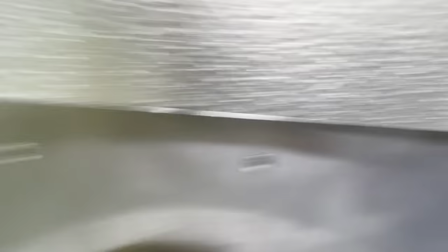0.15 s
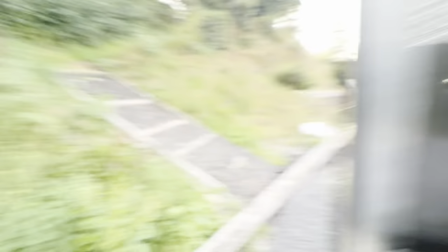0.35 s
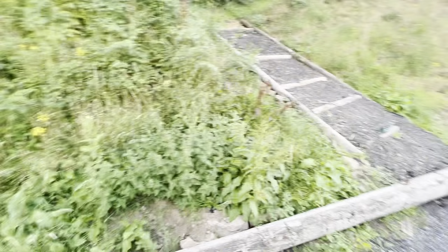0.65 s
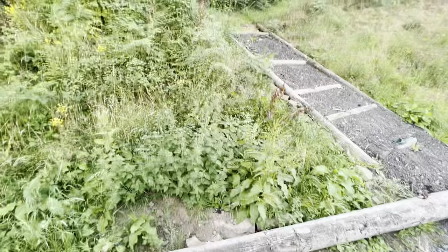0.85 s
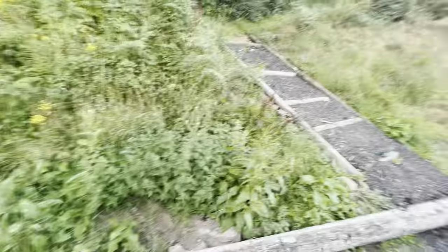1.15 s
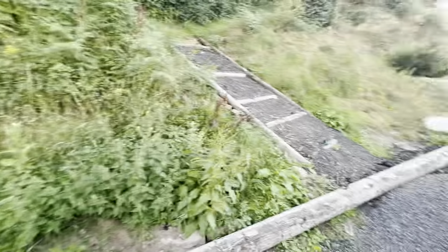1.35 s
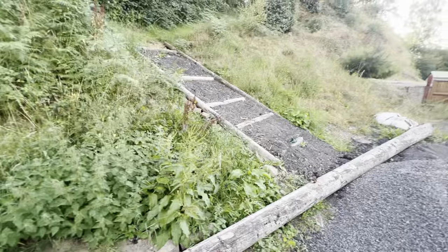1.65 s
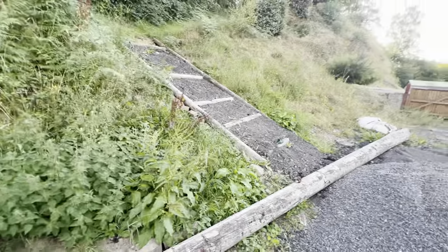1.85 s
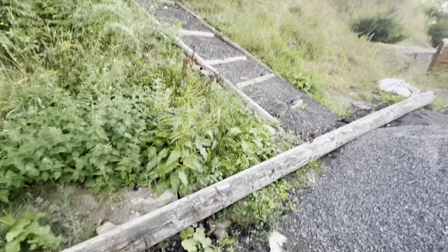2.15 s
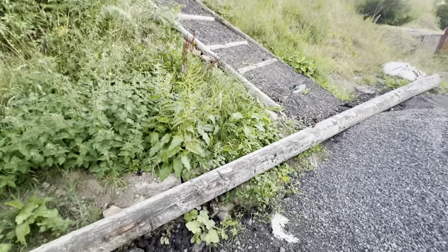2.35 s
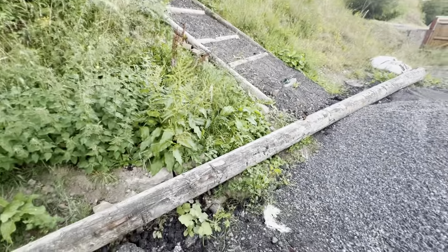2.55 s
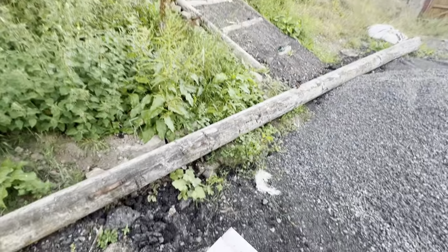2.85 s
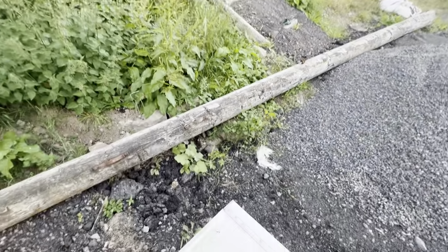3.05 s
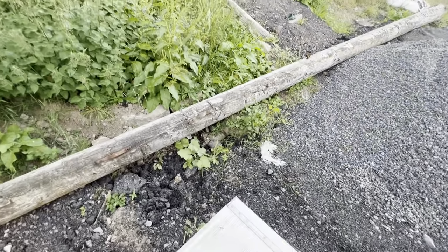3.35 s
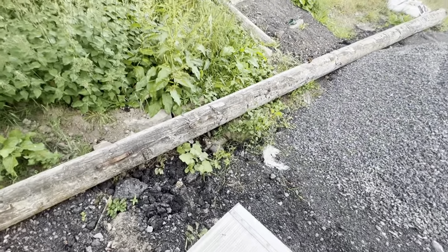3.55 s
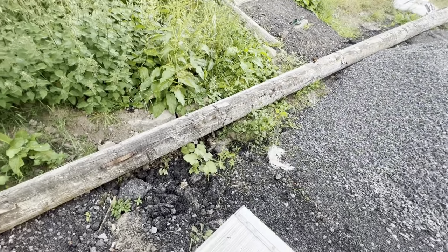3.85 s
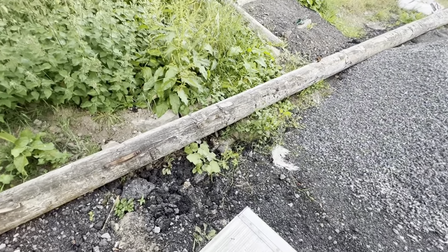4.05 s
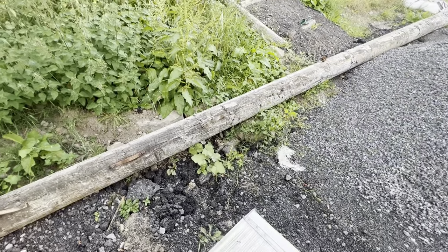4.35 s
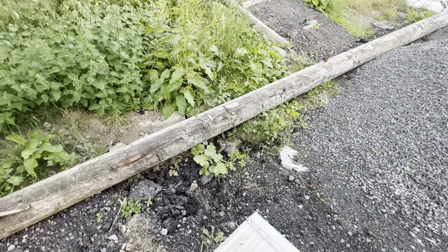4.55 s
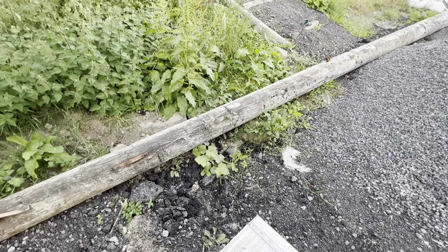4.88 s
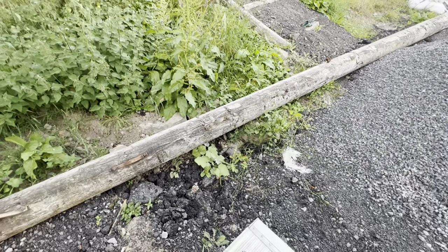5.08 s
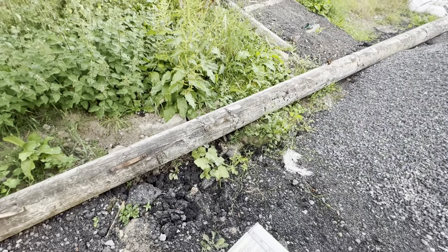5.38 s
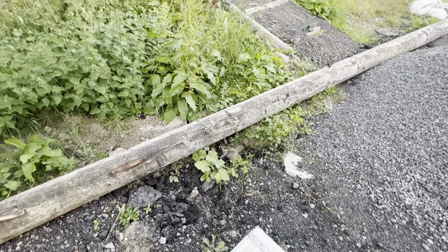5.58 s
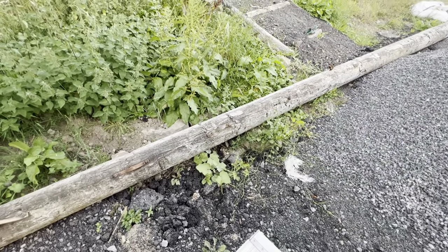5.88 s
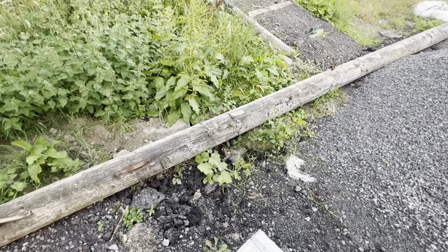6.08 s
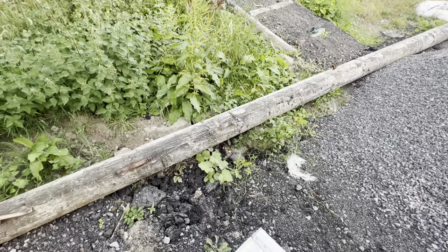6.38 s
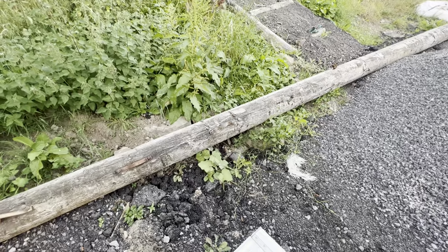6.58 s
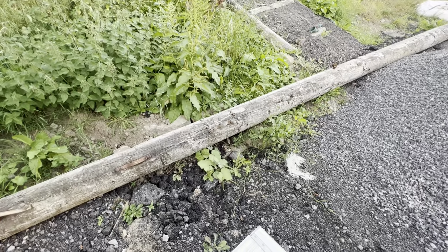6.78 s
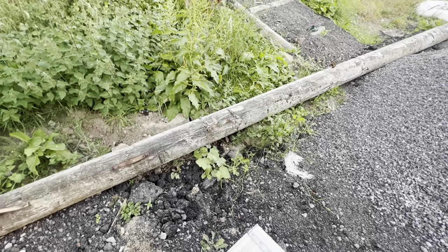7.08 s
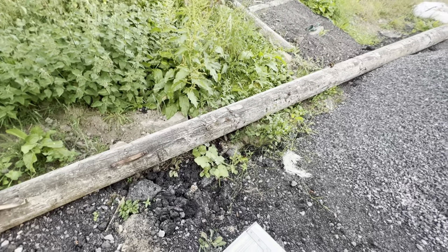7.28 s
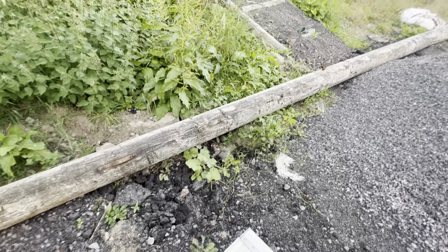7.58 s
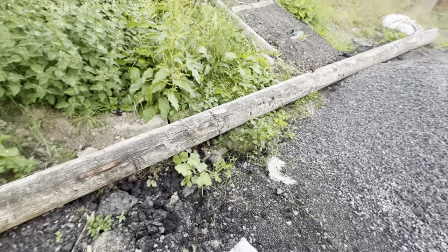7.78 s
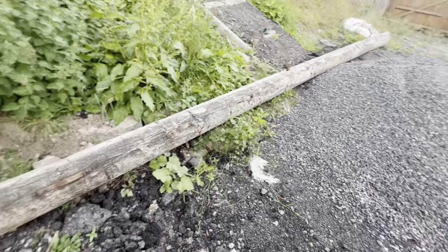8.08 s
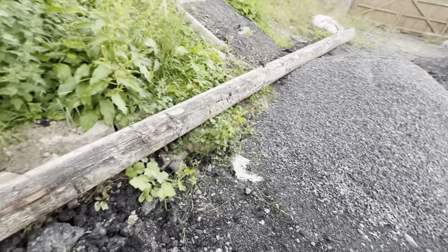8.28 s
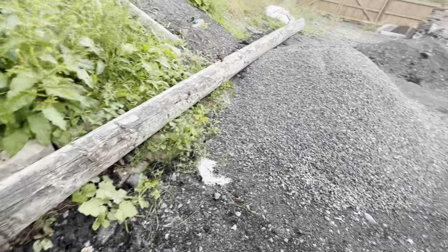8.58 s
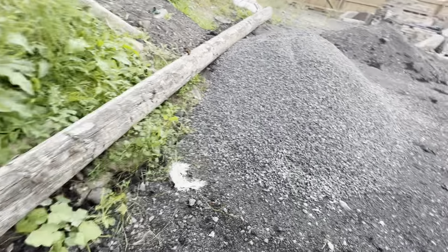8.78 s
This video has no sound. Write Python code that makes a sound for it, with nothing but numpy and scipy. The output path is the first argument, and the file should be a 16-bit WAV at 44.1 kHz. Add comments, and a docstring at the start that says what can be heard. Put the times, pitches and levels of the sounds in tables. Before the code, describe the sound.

A lowering tail lift hisses, judders and clinks before its steel platform thuds down and a flap slams, with boot scuffs on grit.

```python
"""At the back of a truck, a tail lift sinks. Oil throttled by the valve hisses; friction on the runners
makes the platform rumble, judder and squeal; impacts excite the modes of a loose latch and pin.
The carriage meets its end stop and the platform lands with a boom. A boot crushes grit, then a steel
flap slams and rings in its bending modes. Behind it all lie a low boom and a roar: far traffic, plus
the low rumble left after the slam."""
import sys
import numpy as np
from scipy import signal
from scipy.fft import rfft, irfft, next_fast_len
from scipy.io import wavfile
from scipy.ndimage import uniform_filter1d, map_coordinates

SR = 44100
rng = np.random.default_rng(int(sys.argv[2]) if len(sys.argv) > 2 else 0)


def log_audio(samples):
    """Write samples as a 16-bit WAV file to the path given in sys.argv[1]."""
    # one column per channel
    frames = np.atleast_2d(samples).T
    # limit to full scale, then quantise
    limited = np.clip(frames, -1, 1)
    pcm = np.round(limited * 32767).astype(np.int16)
    wavfile.write(sys.argv[1], SR, pcm)


N = 393813

# the sinking lift: t/s, deck rumble/dB, carriage drone/dB, oil flow/dB
DESCENT = [(0, -48.5, -48.5, -52), (.21, -51.5, -54, -61), (.75, -48.5, -56, -58.5),
           (1.0, -51.5, -56.5, -54.5), (1.3, -50, -57, -57), (1.7, -47.5, -58, -60.5),
           (2.14, -47.5, -56, -55.5), (2.58, -51.5, -58, -58.5), (2.95, -48.5, -54, -52.5),
           (3.4, -52.5, -56.5, -55.5), (4.1, -46, -59, -54.5), (4.65, -47, -55, -55),
           (4.93, -44.5, -56, -53.5), (5.4, -48.5, -59.5, -57), (5.62, -53.5, -61.5, -58.5),
           (5.93, -64, -69.5, -72.5), (6.3, -63, -88, -76)]
# noise spectra of the deck, the carriage and the oil's two bands: f/Hz, level/dB
RUMBLE_SPECTRUM = [(15, -54), (30, -7), (75, -1.5), (129, -1.5), (162, 0), (216, -9.5), (314, -13.5),
                   (384, -16), (500, -24.5), (650, -56.5), (1100, -120)]
DRONE_SPECTRUM = [(180, -17.5), (300, -3), (393, 0.5), (555, -6.5), (618, 1), (1090, -0.5), (1530, 0.5),
                  (2190, -9.5), (2600, -26.5), (3380, -44), (5720, -120)]
HISS_SPECTRUM = [(1180, -41.5), (2000, -5), (3020, 0.5), (4020, -5.5), (4970, -1), (5720, -2.5), (6430, -3),
                 (7600, -18.5), (9880, -48), (16700, -120)]
FIZZ_SPECTRUM = [(4470, -39), (7600, -14), (7940, 0), (8990, 2.5), (10300, -10.5), (10800, -27.5),
                 (11600, -25.5), (14300, -13), (16000, -32)]
# the platform judders on its runners: t/s, level/dB
JUDDERS = [(0.14, -46), (0.658, -43.5), (1.283, -50.5), (3.862, -47), (3.981, -46), (4.038, -47),
           (4.092, -45.5), (4.152, -43.5), (4.24, -41.5), (4.307, -44), (4.369, -44), (4.601, -50),
           (4.726, -45), (4.779, -48), (4.835, -43), (5.145, -47.5)]
# the runners squeal: start/s, end/s, start f/Hz, end f/Hz, bandwidth/Hz, level/dB
SQUEAL_BANDS = [(-.2, .24, 3020, 2980, 92, -54.5), (.17, .42, 2950, 2800, 110, -60.5),
                (-.1, 0.64, 1400, 1800, 88, -61.5), (.36, 0.74, 2880, 3170, 140, -58.5),
                (.66, 1.3, 3150, 3300, 120, -61), (1, 2.2, 3130, 3250, 140, -64),
                (1.4, 2.4, 1822, 1750, 52, -66), (1.6, 2.28, 4800, 4900, 110, -66.5),
                (2.25, 2.85, 4330, 4480, 120, -67), (1.5, 2.85, 6150, 6080, 120, -68),
                (3, 4.6, 1700, 1700, 210, -64), (3.88, 4.42, 2310, 2300, 26, -60),
                (4.4, 5.55, 2730, 2850, 100, -59), (4.8, 5.4, 2950, 3130, 170, -54.5),
                (4.4, 5.45, 5540, 5540, 50, -60), (3.25, 4.4, 4950, 4850, 100, -67.5),
                (4.4, 5.35, 5050, 5150, 59, -64), (5.6, 6.22, 3330, 3500, 290, -69.5)]
# loose steel parts knock: t/s, latch level/dB, frame level/dB, jangle T60/s, left minus right/dB
LATCH_KNOCKS = [(0.892, -19, -37, 0.041, 7.5), (0.9053, -16.5, -35, 0.046, -4),
                (0.9255, -8, -22.5, 0.045, 1.2), (0.941, -20, -37.5, 0.076, -12),
                (0.962, -2, -23, 0.057, -5.5), (0.9714, -20, -38.5, 0.14, -3),
                (1.473, -36.5, -43.5, 0.085, -1), (1.963, -49, -43.5, 0.099, -3),
                (2.101, -36.5, -47.5, 0.28, 5.5), (3.7648, -20, -40.5, 0.073, 0),
                (3.823, -39.5, -61, .065, 5), (5.009, -37, -48, .065, -2), (5.145, -45, -47, 0.053, -5),
                (7.5722, -45, -42.5, .1, -3), (7.652, -23.5, -38, 0.042, -1.2),
                (7.745, -19.5, -44, .035, 1.5), (7.989, -49, -36, 0.13, 2), (8.04, -37, -19, 0.13, -1),
                (8.825, -43, -49, 0.081, 4), (8.87, -32, -45.5, 0.099, 0.5)]
# resonances of the latch and the frame: f/Hz, bandwidth/Hz, level/dB
LATCH_MODES = [(2820, 170, 2), (4930, 780, -1), (5240, 160, 0), (5770, 89, 3.5), (6200, 140, -17),
               (7300, 500, -2.5), (8510, 430, 1), (8260, 200, -6.5), (9750, 490, -6)]
FRAME_MODES = [(851, 24, 3.5), (1130, 40, -6.5), (1340, 90, 0), (1510, 60, 0), (1930, 90, -7.5),
               (2480, 150, -7), (2825, 90, -6.5)]
# the frame's dull clonk and the pin's bright clack: f/Hz, level/dB
CLONK_SPECTRUM = [(180, -29.5), (300, -9), (494, -15), (1130, 0.5), (1230, -15), (1320, 0.5), (2800, -14),
                  (4000, -20.5), (5200, -48), (8800, -120)]
CLACK_SPECTRUM = [(590, -25), (1000, -5), (2250, -4), (3380, 2.5), (5310, -9), (5830, 0), (7620, -14),
                  (9170, -8), (10900, -28.5), (16000, -35)]
# a loose pin chatters in its hole: t/s, level/dB
PIN_BOUNCES = [(2.848, -39), (2.8584, -30.5), (2.9138, -29.5), (2.9757, -30.5), (3.032, -30.5),
               (3.083, -34.5), (3.132, -31.5), (3.1818, -32), (3.225, -40), (3.258, -43), (4.7638, -35.5),
               (4.8313, -41), (5.3194, -27), (5.389, -32.5), (5.451, -35), (5.5213, -31), (5.577, -31),
               (5.6277, -33), (5.675, -39.5), (5.7322, -43.5), (8.282, -40.5), (8.368, -45), (8.54, -48)]
# its free vibrations: f/Hz, level/dB, T60/s
PIN_MODES = [(1480, 2, 0.16), (1763, -0.5, 0.16), (3050, 4.5, 0.19), (3320, 4, 0.13), (3450, 0, 0.12),
             (3960, 2, 0.15), (4790, -0.5, 0.14), (5730, 2, 0.16), (6360, -1, 0.17), (6560, -1, 0.15),
             (6700, -3, 0.11), (9300, -15, .06)]
# weight lands on the platform: t/s, level/dB, contact time/s
DECK_BLOWS = [(1.187, -42.5, 0.002), (5.334, -22.5, .004), (5.356, -23, 0.003), (5.377, -24, 0.0049),
              (5.404, -23.5, 0.0055), (5.462, -29, 0.0055), (7.589, -29, 0.005), (7.601, -35, 0.006),
              (7.662, -38, 0.0058), (7.725, -30.5, 0.0052), (8.041, -8, 0.0035), (8.056, -5.5, 0.00342),
              (8.066, -6.5, 0.003), (8.077, -10, 0.0027), (8.109, -18, 0.0032), (8.133, -10, 0.00425),
              (8.148, -15.5, 0.0033), (8.198, -25.5, 0.0025), (8.24, -23, 0.0033), (8.269, -24.5, 0.0028),
              (8.3, -27, 0.0031), (8.34, -32, 0.0038), (8.537, -31.5, 0.0039), (8.704, -30.5, 0.0036),
              (8.74, -35.5, 0.0041), (8.8, -43, 0.0046)]
# resonances of the deck, the end stop and the flap's panel: f/Hz, bandwidth/Hz, level/dB
DECK_MODES = [(84, 12.4, -6), (118, 20, -12), (143.4, 12.7, -4.5), (165.3, 9, 1), (182.8, 14.2, -1.5),
              (255.7, 17, -8), (298, 16.6, -6), (342.7, 12, -2.5), (449, 42, 0), (670, 143, -3)]
STOP_MODES = [(2840, 180, -2.5), (3050, 56, -2), (4600, 140, -5), (5360, 160, -0.5), (5940, 270, -8)]
PANEL_MODES = [(450, 26, 1), (563, 53, -5), (672, 60, -3), (875, 92, -4), (1012, 66, 0), (1113, 34, 1.5),
               (1188, 43, 1.5), (1440, 100, -4.5), (2030, 210, -16.5)]
# the flap hits and rebounds: start/s, attack/s, level/dB, hold/s, sag/(dB/s), release/(dB/s)
BODY_SWELLS = [(8.037, 0.0043, -25, 0.016, 98, 450), (8.048, 0.0084, -12.5, 0.0053, 300, 600),
               (8.074, 0.0033, -24, 0.0067, 200, 500), (8.09, 0.019, -32, 0.058, 7, 189)]
CLATTER_SWELLS = [(8.081, 0.0083, -23.5, 0.066, 30, 800), (8.159, 0.0074, -39.5, 0.071, 101, 300)]
RING_SWELLS = [(8.082, 0.0043, -18.5, 0.034, 150, 500), (8.095, 0.026, -19.5, 0.038, 150, 900),
               (8.172, 0.011, -35, 0.051, 200, 700)]
# the flap's broad clatter and its thin, high modes: f/Hz, level/dB
SHEET_SPECTRUM = [(1180, -16), (2000, -11.5), (3040, -7.5), (5300, -12.5), (5730, -7), (6090, -13.5),
                  (6820, -13), (7640, -17.5), (8630, -14), (10500, -23.5), (10900, -61), (12000, -26),
                  (16000, -48)]
FLAP_MODES = [(5568, -1.5), (6794, -12), (6600, -18), (6340, -21), (3080, -17), (3388, -17), (4905, -18),
              (5040, -19), (4656, -21), (8340, -22)]
# a boot scuffs: start/s, attack/s, level/dB, hold/s, sag/(dB/s), release/(dB/s)
SCUFF_SWELLS = [(.1, 0.072, -53.5, .005, 11.5, 600), (2.1, 0.091, -60, .01, 10, 400),
                (7.195, 0.11, -61, .25, 24.5, 31), (7.535, .03, -64, 0.061, 10, 300),
                (7.637, 0.014, -50.5, 0.099, -30, 300), (7.739, 0.039, -41, 0.04, 32, 899),
                (7.846, .02, -68, 0.2, 6, 50), (8.196, 0.091, -57, 0.33, 6, 46),
                (8.676, 0.076, -57, .04, 22, 202), (8.814, .015, -56.5, 0.097, 10, 100)]
# spectra of crushed grit and of dry clicks: f/Hz, level/dB
GRIT_SPECTRUM = [(350, -39), (600, -11.5), (717, -20), (944, -1.5), (1550, -7), (4160, -8.5), (4780, -6),
                 (7410, -15.5), (8620, -3.5), (11700, -22), (14500, -28), (16000, -39)]
CRACK_SPECTRUM = [(700, -30), (1400, 3), (3000, -1), (6800, -1), (9000, -0.5), (12000, -27)]
# dry clicks, ticks of a tiny part and pings of a small plate: t/s, level/dB
CRACK_HITS = [(.398, -34), (7.299, -56), (7.3205, -40.5), (7.3806, -43), (7.386, -40.5), (7.457, -47),
              (7.548, -49), (7.685, -45), (7.7725, -43), (7.783, -41), (7.795, -34), (7.808, -32),
              (7.826, -39)]
TICK_HITS = [(0.9864, -37.5), (0.995, -34.5), (1.0044, -38), (1.0296, -40), (1.049, -35.5), (1.063, -43),
             (1.0804, -47), (1.121, -42.5), (1.153, -46), (1.1837, -48), (1.6844, -50.5), (1.714, -52),
             (4.9761, -48.5)]
PING_HITS = [(.398, -44), (1.474, -41), (1.963, -47)]
# resonances of the tiny part: f/Hz, bandwidth/Hz, level/dB
TICK_MODES = [(6900, 500, -9), (8280, 500, 0), (9640, 700, -5)]
# background: far traffic, plus the low rumble left after the slam: t/s, boom/dB, roar/dB
BACKGROUND_LEVELS = [(.25, -46.5, -62.5), (.9, -58, -63), (5.8, -60, -63.5), (6.8, -56.5, -64.5),
                     (7.45, -53.5, -61), (7.75, -55, -58.5), (8, -50, -60.5), (8.3, -39.5, -59.5),
                     (8.55, -53, -60), (8.93, -45.5, -57)]
# spectra of the boom and the roar: f/Hz, level/dB
BOOM_SPECTRUM = [(13, -44.5), (25, -20), (33, -7), (70, -6), (82, -1.5), (92, -16), (129, -11.5),
                 (150, -14.5), (450, -30.5), (580, -73), (990, -120)]
ROAR_SPECTRUM = [(260, -49), (450, -11), (580, -11), (664, -10), (818, -3), (950, 2), (1420, -4), (1680, 0),
                 (2620, -27.5), (5380, -28.5), (6930, -21), (10200, -30), (12600, -28.5), (16000, -39.5)]
# likeness of the left and right channels: f/Hz, correlation/1
COHERENCE = [(60, 0.94), (200, 0.89), (450, 0.07), (1200, 0.067), (1800, 0.048), (4000, 0.048),
             (9500, 0.12), (10500, 0.87), (12500, 0.67)]
# balance of sound from the lift's side and from the road's: f/Hz, left minus right/dB
LIFT_BALANCE = [(60, 2), (200, .5), (700, -2.5), (1290, 4.5), (2380, 4), (4400, 11), (8120, 12),
                (10000, -6), (15000, 2)]
ROAD_BALANCE = [(60, 2.5), (240, -0.5), (950, 2.5), (3770, 21.5), (10000, 1.5)]
# the left microphone hears later: f/Hz, left phase lead/cycles
PHASE_LEAD = [(0, 0), (260, -.015), (600, -.28), (10500, -4.5), (11300, -4.5), (12300, -5), (22050, -5)]
# a dip in the microphones' response: f/Hz, gain/dB
MIC_DIP = [(7000, 0.5), (7450, -2), (7650, -15.5), (7850, -0.5), (8200, 0)]


def lift():
    """Turbulence in the valve makes the oil hiss; sliding friction shakes the deck and the carriage."""
    rumble_db, drone_db, flow_db = curves(DESCENT, outside=-120)
    shake = wobble(14)
    jolts = blows([(s - .004, db) for s, db in JUDDERS], t60=.11, rise=.0061)
    rumble = amp(rumble_db + 1.9 * shake + 1.4 * wobble(2.6)) * noise(spectrum(RUMBLE_SPECTRUM))
    drone = (amp(drone_db + .66 * shake) + jolts) * noise(spectrum(DRONE_SPECTRUM), streak_db=4)
    hiss_gain = amp(flow_db - 2.5 + .85 * wobble(6.1)) + amp(-9.5) * jolts
    hiss = hiss_gain * noise(spectrum(HISS_SPECTRUM), streak_db=3.6, streak_frames=15)
    fizz_db = -67.5 + 1.8 * (flow_db + 54.5) + .8 * wobble(15)  # swings wider than the flow
    sizzle = swell(start=1.35, attack=0, db=-95, hold=0, sag=0, release=60)
    fizz = (amp(fizz_db) + sizzle) * noise(spectrum(FIZZ_SPECTRUM), streak_db=3)
    return rumble + drone + hiss + fizz


def runner_squeals():
    """Friction excites narrow bands: low-passed noise modulates a gliding, wavering carrier."""
    out = np.zeros((2, N))
    for start, end, start_hz, end_hz, width_hz, db in SQUEAL_BANDS:
        n, first = round((end - start) * SR), round(start * SR)
        pole = np.exp(-np.pi * width_hz / SR)
        slow = signal.lfilter([1], [1, -pole], rng.standard_normal((3, 2, n)))
        drift = slow[0] + 1.2 * slow[1:]  # a shared part plus one for each channel
        hz = np.linspace(start_hz, end_hz, n) * (1 + .009 * wobble(14, n))
        phase = 2 * np.pi * np.cumsum(hz) / SR
        band = unit_rms(drift[:, 0] * np.cos(phase) + drift[:, 1] * np.sin(phase))
        squeal = band * signal.windows.tukey(n, .35) * amp(db + 1.1 * wobble(12, n))
        out[:, max(first, 0):first + n] += squeal[:, max(-first, 0):]
    return from_lift(out)


def latch_knocks():
    """Impact excitation: each contact rings the latch and the frame, then dies away as a jangle."""
    def steel(hz):
        contact = 1 / (1 + 1j * hz / 9000 - (hz / 10000) ** 2) ** 3  # finite contact cuts the top treble
        return contact * (modes(LATCH_MODES)(hz) + modes([(4500, 9000, -8.5)])(hz))

    times, latch_db, frame_db, t60, balance_db = np.transpose(LATCH_KNOCKS)
    sides_db = np.outer(balance_db, [.5, -.5])
    latch = list(zip(times, latch_db[:, None] + sides_db))
    frame = list(zip(times, frame_db[:, None] + sides_db))
    snap = amp(22) * blows(latch, t60=.005, rise=.0036) * rng.standard_normal(N)
    tap = amp(23) * blows(frame, t60=.005, rise=.003) * rng.standard_normal(N)
    ring = from_lift(filtered(snap, steel) + filtered(tap, modes(FRAME_MODES)))
    jangle = amp(-19.5) * blows(latch, t60, rise=.00044) * noise(steel)
    clonk = blows(frame, 1.08 * t60, rise=.00083) * noise(spectrum(CLONK_SPECTRUM))
    return ring + jangle + clonk


def pin_rattle():
    """Damped free vibration: each bounce rings the pin's modes at new strengths, over a brief jangle."""
    ring, t = np.zeros((2, N)), np.arange(SR // 5) / SR
    hz, mode_db, t60 = np.transpose(PIN_MODES)[..., None]
    onset = 1 - np.exp(-t / .001)
    for s, db in PIN_BOUNCES:
        scatter = rng.standard_normal((4, len(PIN_MODES), 1))  # level, pitch, left and right phase
        decay = amp(mode_db + 2.5 * scatter[0] - 60 * t / t60)
        phase = 2 * np.pi * hz * (1 + .004 * scatter[1]) * t + 1.12 * scatter[2:]
        ring[:, round(s * SR):][:, :len(t)] += amp(db - 20) * onset * (decay * np.sin(phase)).sum(1)
    clack = noise(spectrum(CLACK_SPECTRUM)) + amp(-6) * noise(spectrum(DRONE_SPECTRUM))
    return from_lift(ring) + amp(-9) * blows(PIN_BOUNCES, t60=.1, rise=.00067) * clack


def deck_thuds():
    """Force pulses drive the deck's modes; the shorter the contact, the higher its spectrum reaches."""
    force = np.zeros(N + SR)
    for s, db, contact_s in DECK_BLOWS:
        pulse = np.hanning(round(contact_s * SR))
        force[round(s * SR):][:len(pulse)] += amp(db + 48) * pulse / pulse.sum()
    boom = from_lift(filtered(force[:N], modes(DECK_MODES)))
    shudder = noise(modes(DECK_MODES[1:5])) + amp(-14.5) * noise(modes(DECK_MODES[7:]))
    return boom + amp(-13) * blows(DECK_BLOWS, t60=.26, rise=.00092) * shudder


def flap_slam():
    """Plate vibration: the flap bounces shut with a boxy body, sheet clatter and thin ringing modes."""
    first = round(RING_SWELLS[0][0] * SR)
    tones, t = np.zeros(N), np.arange(N - first) / SR
    for hz, db in FLAP_MODES:
        gain = amp(db + 1.5 * wobble(35, len(t)))
        tones[first:] += gain * np.sin(2 * np.pi * hz * t + .4 * wobble(45, len(t)))
    body_gain = swells(BODY_SWELLS)
    sheet_gain = swells(CLATTER_SWELLS) + amp(-21) * body_gain
    clatter = sheet_gain * amp(1.86 * wobble(90)) * noise(spectrum(SHEET_SPECTRUM))
    body = body_gain * noise(modes(PANEL_MODES), ROAD_BALANCE)
    ring = swells(RING_SWELLS) * amp([[5], [-12]]) * tones  # louder on the left
    return body + clatter + ring


def end_stop():
    """The carriage strikes its stop: one clank decays exponentially in a few bright resonances."""
    return blows([(5.319, -31)], t60=.11, rise=.0015) * noise(modes(STOP_MODES))


def boot_scuffs():
    """Grit crushed under a sole: random amplitude modulation breaks noise into spiky grains."""
    grains = unit_rms(amp(4 * wobble(700) + 1.7 * wobble(40)))
    return swells(SCUFF_SWELLS) * grains * noise(spectrum(GRIT_SPECTRUM))


def cracks():
    """Broadband transients a few milliseconds long are heard as dry clicks without pitch."""
    return blows(CRACK_HITS, t60=.013, rise=.00047) * noise(spectrum(CRACK_SPECTRUM), ROAD_BALANCE)


def ticks():
    """A tiny part has high, heavily damped resonances, so it only ticks."""
    return blows(TICK_HITS, t60=.017, rise=.0006) * noise(modes(TICK_MODES))


def plate_pings(hz=2800):
    """A small plate rings as a damped oscillator with a single mode."""
    tone = np.sin(2 * np.pi * hz * np.arange(N) / SR)
    return from_lift(blows(PING_HITS, t60=.028, rise=.00082) * tone)


def background():
    """Incoherent noise as a low boom and a roar: far traffic, plus the low rumble left after the slam."""
    boom_db, roar_db = curves(BACKGROUND_LEVELS)
    boom = amp(boom_db + .69 * wobble(4)) * noise(spectrum(BOOM_SPECTRUM), ROAD_BALANCE)
    roar = amp(roar_db + .21 * wobble(2.5)) * noise(spectrum(ROAR_SPECTRUM), ROAD_BALANCE)
    return boom + roar


def amp(db):
    """Amplitude ratio of a level in decibels."""
    return 10 ** (np.asarray(db) / 20)


def unit_rms(x):
    """Normalisation to unit mean power."""
    return x / np.sqrt(np.mean(x ** 2) + 1e-20)


def on_log_axis(points, hz):
    """Interpolation of (f/Hz, value) points over log frequency."""
    f, values = np.transpose(points)
    return np.interp(np.log(hz + 1), np.log(f + 1), values)


def spectrum(points):
    """Magnitude response through (f/Hz, level/dB) points."""
    return lambda hz: amp(on_log_axis(points, hz))


def modes(table):
    """Modal superposition: second-order resonances summed with alternating signs."""
    return lambda f: sum((-1) ** k * amp(db) * 1j * f * width / (f0 ** 2 - f ** 2 + 1j * f * width)
                         for k, (f0, width, db) in enumerate(table))


def filtered(x, response):
    """Convolution as a product of spectra."""
    size = next_fast_len(N + 8192)
    return irfft(rfft(x, size) * response(np.fft.rfftfreq(size, 1 / SR)), size)[..., :N]


def curves(rows, outside=None):
    """Linear interpolation in time of each column after the first."""
    times, *columns = np.transpose(rows)
    return [np.interp(np.arange(N) / SR, times, column, outside, outside) for column in columns]


def wobble(rate, n=N):
    """Smooth random modulation: a spline through `rate` Gaussian knots a second."""
    grid = np.arange(int(8 * n * rate / SR) + 2) / 8
    knots = rng.standard_normal(len(grid) // 8 + 4)
    return np.interp(np.arange(n) * rate / SR, grid, map_coordinates(knots, [grid]))


def blows(hits, t60, rise):
    """Exponential rise and decay (both in s) at each (t/s, level/dB); a level may be a stereo pair."""
    envelope, t = np.zeros((2, N + SR)), np.arange(SR // 5) / SR
    for (s, db, *_), decay_s in zip(hits, np.broadcast_to(t60, len(hits))):
        blow = amp(-60 * t / decay_s) * (1 - np.exp(-t / rise))
        envelope[:, round(s * SR):][:, :len(t)] += np.outer(amp(db), blow)
    return envelope[:, :N]


def swell(start, attack, db, hold, sag, release):
    """Envelope in exponential segments: it climbs 30 dB, sags while held, then falls away."""
    envelope, first = np.zeros(N), round(start * SR)
    t = np.arange(min(SR, N - first)) / SR
    held_db = db - sag * hold
    times = [0, attack, attack + hold, attack + hold + 2]
    levels = [db - 30, db, held_db, held_db - 2 * release]
    envelope[first:first + len(t)] = amp(np.interp(t, times, levels))
    return envelope


def swells(rows):
    """Superposition of one swell for each row."""
    return sum(swell(*row) for row in rows)


def noise(response, balance=LIFT_BALANCE, streak_db=0, streak_frames=7):
    """Partly coherent stereo noise of unit mid rms; streaks are thin bands of random gain."""
    size = next_fast_len(N, True)
    hz = np.fft.rfftfreq(size, 1 / SR)
    if streak_db:
        frames = signal.stft(rng.standard_normal((2, size)), nperseg=1024)[2]
        streaks = uniform_filter1d(rng.standard_normal(frames.shape[1:]), size=2, axis=0)
        streaks = unit_rms(uniform_filter1d(streaks, size=streak_frames, axis=1))
        bins = rfft(signal.istft(frames * amp(streak_db * streaks), nperseg=1024)[1], size)
    else:
        bins = rng.standard_normal((2, len(hz), 2)) @ [1, 1j]
    angle = np.arccos(on_log_axis(COHERENCE, hz)) / 2
    mid, side = bins * [np.cos(angle), np.sin(angle)]
    pair = irfft(response(hz) * mic_pair(hz, balance) * [mid + side, mid - side], size)[:, :N]
    return pair / np.std(pair.mean(0))


def mic_pair(hz, balance):
    """Differences of level and phase, split evenly between two microphones."""
    lead = np.interp(hz, *np.transpose(PHASE_LEAD))
    left = amp(on_log_axis(balance, hz) / 2) * np.exp(1j * np.pi * lead)
    return np.array([left, 1 / left])


def from_lift(x):
    """Localisation: x takes on the level and phase differences of the lift's side."""
    return filtered(x, lambda hz: mic_pair(hz, LIFT_BALANCE))


def scene():
    """Linear superposition of all the sources."""
    machine = lift() + runner_squeals() + pin_rattle() + latch_knocks() + end_stop()
    small_sounds = ticks() + plate_pings() + cracks()
    return machine + small_sounds + deck_thuds() + flap_slam() + boot_scuffs() + background()


def record(dry, ceiling=.9, top_hz=15800):
    """Transduction: the microphones' dip, soft saturation of peaks and a steep band limit."""
    dipped = filtered(dry, spectrum(MIC_DIP))
    limited = dipped / (1 + np.abs(dipped / ceiling) ** 4) ** (1 / 4)
    return filtered(limited, lambda hz: 1 / (1 + (hz / top_hz) ** 120))


dry = scene()
out = record(dry)
log_audio(out)
```